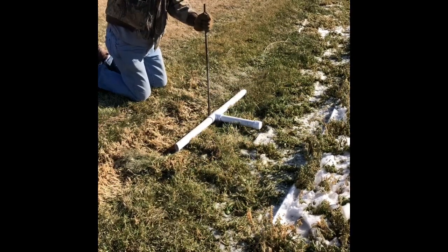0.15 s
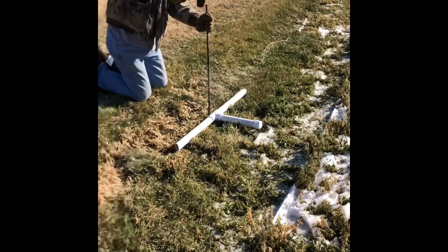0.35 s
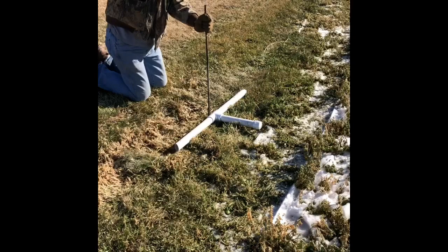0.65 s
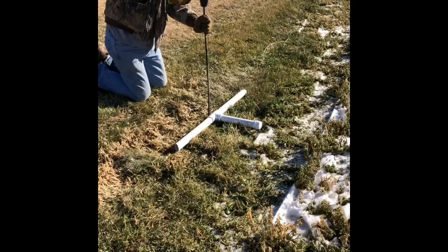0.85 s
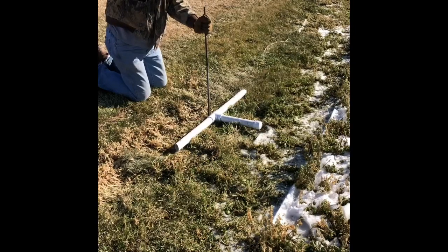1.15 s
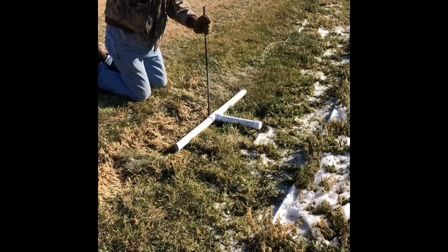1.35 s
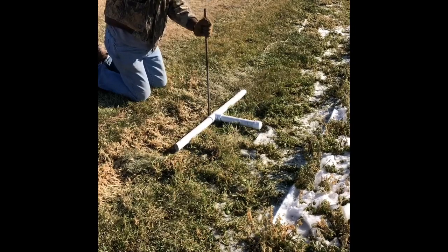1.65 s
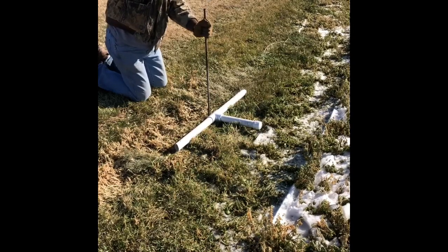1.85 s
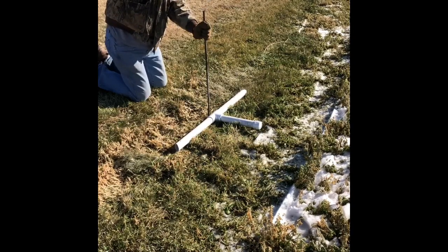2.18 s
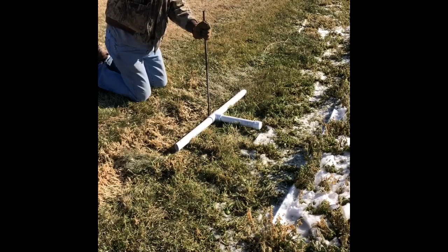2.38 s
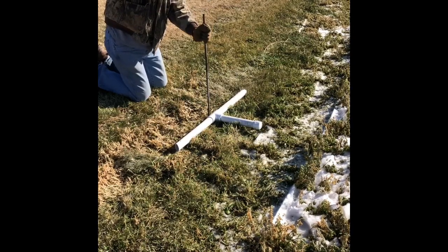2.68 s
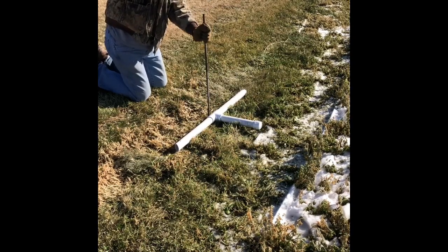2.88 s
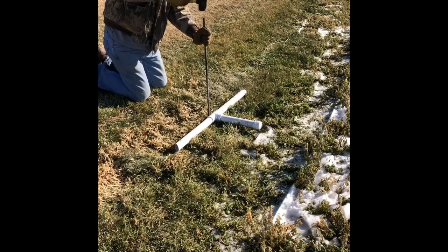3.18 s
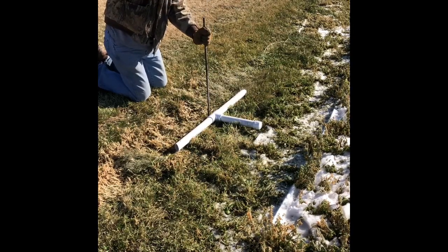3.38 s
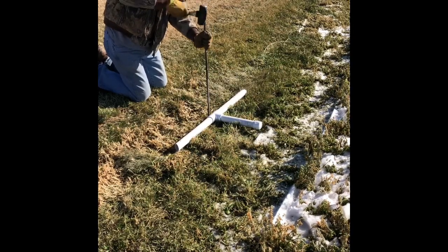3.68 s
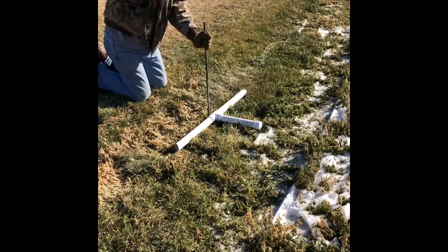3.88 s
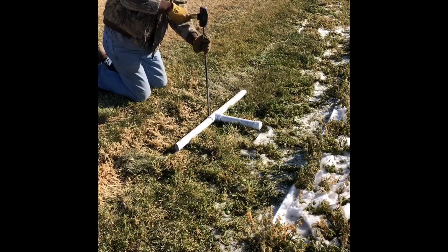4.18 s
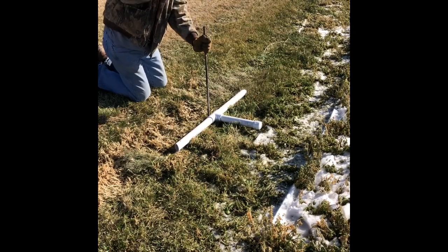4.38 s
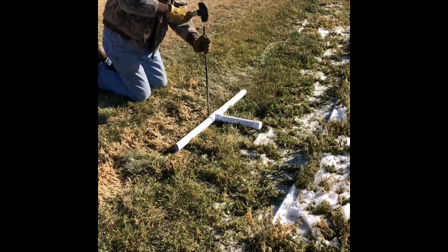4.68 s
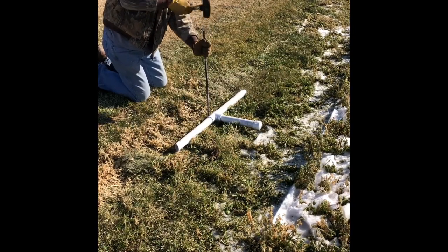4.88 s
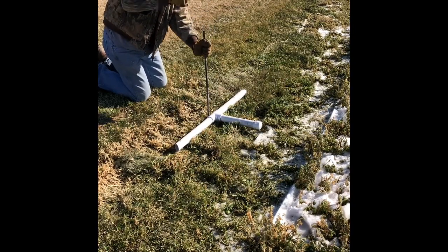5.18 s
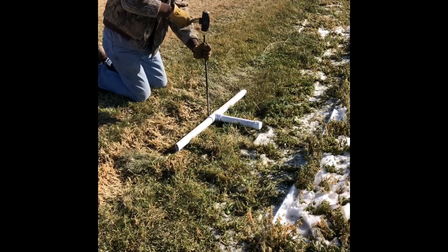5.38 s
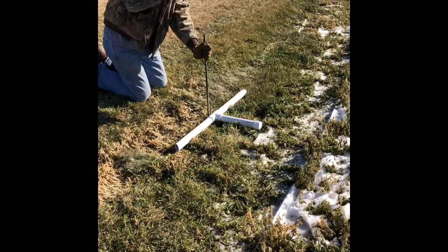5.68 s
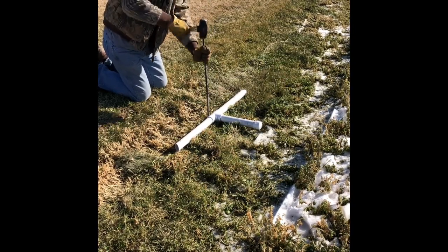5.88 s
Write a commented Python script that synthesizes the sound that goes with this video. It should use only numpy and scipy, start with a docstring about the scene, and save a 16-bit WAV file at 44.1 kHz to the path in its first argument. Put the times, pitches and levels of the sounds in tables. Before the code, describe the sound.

Steady hammer blows on a steel stake outdoors, each a short metallic clink with a soft thud from the soil.

```python
"""A quiet yard rumbles faintly and dry grass ticks. Then a small sledge drives a thin steel stake through a
plastic pipe stand into the frozen lawn, eleven steady blows. A gloved hand damps the stake, so each is a
short bright clink with a thud from the soil. Between blows a sleeve swishes. As the stake seats, the thud
shrinks and the steel rings and chatters more. Before the last blow, wind puffs against the microphone."""
import sys
import numpy as np
from scipy import signal
from scipy.fft import rfft, irfft
from scipy.io import wavfile
from scipy.ndimage import uniform_filter1d

SR = 44100
rng = np.random.default_rng(int(sys.argv[2]) if len(sys.argv) > 2 else 0)


def generate_wav(sig):
    """Save sig (samples, or channels by samples) to the path in sys.argv[1] as 16-bit PCM at SR."""
    pcm = np.round(np.clip(np.atleast_2d(sig).T, -1, 1) * 32767).astype(np.int16)
    wavfile.write(sys.argv[1], SR, pcm)


N = 266805
TIME = np.arange(N) / SR
HIT = np.arange(8192) / SR  # time axis of a one-shot [s]

# modes of the stake and hammer head (frequency [Hz])
STEEL_MODES = [1115, 2330, 2830, 3462, 4238, 4935, 5670, 6580, 7398, 8324, 9350, 10330, 11390, 12480, 13630,
               14785, 15615]


def amp(db):
    """Decibels to gain."""
    return 10 ** (np.asarray(db) / 20)


def read(points, hz):
    """Reads a curve on a log-frequency axis."""
    f, value = np.transpose(points)
    return np.interp(np.log(hz + 1), np.log(f), value)


def bins(x):
    """Frequencies of the spectrum of x."""
    return np.fft.rfftfreq(len(x), 1 / SR)


def bell(hz, centre_hz, octaves):
    """A bell curve on the log-frequency axis."""
    return np.exp(-.5 * (np.log2((hz + 1) / centre_hz) / octaves) ** 2)


def noise(t, colour_db):
    """Noise of rms 1, coloured bin by bin."""
    x = irfft(rfft(rng.standard_normal(len(t))) * amp(colour_db), len(t))
    return x / x.std()


def packed(x, seconds):
    """Scales x to the energy of a unit signal lasting that long."""
    return x * np.sqrt(seconds * SR / np.sum(x ** 2))


def add(mix, s, sound):
    """Lays a sound into the mix at time s."""
    part = mix[max(round(s * SR), 0):][:len(sound)]
    part += sound[:len(part)]


def seating(seated, loose, firm):
    """Morphs a setting from a loose stake (0) to a firm one (1)."""
    return loose + (firm - loose) * np.clip(seated, 0, 1)


def air(bed_db=-64, drone_hz=113, drone_db=-70):
    """The outdoor bed: distant rumble and hiss with a far, wavering drone."""
    # colour of the bed (frequency [Hz], level [dB])
    colour = [(20, -25.5), (45, -4.5), (75, 0.5), (112, -0.5), (150, -6), (250, -11.5), (450, -14.5),
              (800, -18), (1300, -26), (2200, -30), (5000, -33.5), (10000, -34.5), (15600, -39.5),
              (16200, -59.5)]
    f = bins(TIME)
    drone = noise(TIME, -20 * np.log10(1 + ((f - drone_hz) / 7) ** 2))
    return amp(bed_db) * noise(TIME, read(colour, f)) + amp(drone_db) * drone


def grass_ticks(t60=.0059):
    """Dry grass gives thin, bright ticks."""
    # tick cues (time [s], level [dB])
    ticks = [(.014, -63.5), (.489, -63.5), (.596, -65), (1.138, -63.5), (2.635, -66), (4.26, -64),
             (6.015, -61)]
    out = np.zeros(N)
    for s, db in ticks:
        tick = noise(HIT, 30 * bell(bins(HIT), 12000, octaves=1)) * amp(-60 * HIT / t60)
        add(out, s, amp(db) * packed(tick, .0014))
    return out


def hammering():
    """Each blow clinks, bends the stake and thumps the soil; a firm stake thumps less and chatters more."""
    # sledge blows (time [s], level [dB], seating [0 loose to 1 firm], midrange clank [dB],
    # bending wave [dB], its centre [Hz], first bounce after [s], fade per bounce [dB])
    blows = [(0.2953, -11.5, 0, 0.5, -24, 340, 0.0044, -7),
             (0.8398, -11.5, 0.016, -3.5, -32, 400, .0045, -14.5),
             (1.3890, -10, 0.22, 1.5, -26.5, 300, 0.0057, -5),
             (1.9343, -9.5, 0.54, 0, -27, 1100, 0.0045, -2),
             (2.4773, -11.5, 0.66, -2.5, -36, 300, 0.0081, -2.5),
             (3.0336, -12, 0.77, 0, -31, 850, 0.0084, -1.5), (3.589, -11.5, 0.83, 8, -37, 800, 0.0094, -2),
             (4.1392, -11, .85, 0.5, -36.5, 700, .0097, 0), (4.6883, -11.5, 0.98, 7, -36.5, 800, 0.0095, 0),
             (5.2521, -11.5, 0.91, 8.5, -33.5, 780, 0.0085, -1),
             (5.8265, -12, 0.82, 5, -28, 800, 0.0077, 0.5)]
    out = np.zeros(N)
    for s, db, seated, clank_db, bend_db, bend_hz, gap, fade_db in blows:
        t60 = seating(seated, .026, .021)
        ring_db = seating(seated, -3.5, 5)  # clear ring against the crack
        tilt_db = seating(seated, 19.5, -2)  # per octave
        strike = clink(clank_db, ring_db, tilt_db, crack_t60=t60, ring_t60=1.25 * t60, snap=.7)
        add(out, s, amp(db) * strike)
        add(out, s, amp(bend_db) * bending_wave(bend_hz))
        add(out, s, amp(-44) * yard_tail())

        bounces, last_s = chatter(gap, fade_db)
        add(out, s, amp(db + seating(seated, -16.5, -9.5)) * bounces)
        add(out, s + last_s, amp(seating(seated, -62, -51.5)) * yard_tail())
        add(out, s + last_s + .013, amp(-44.5) * stake_tap())  # a faint last tap just after the chatter

        firmness = seated ** .6  # the thud shrinks most in the first few blows
        thud = low_thud(low_cut_hz=seating(firmness, 50, 121))  # tighter as the stake seats
        thud_delay = seating(firmness, .0155, .0145)
        add(out, s + thud_delay, amp(seating(firmness, -29.5, -40.5)) * thud)
    return out


def clink(clank_db, ring_db, tilt_db, crack_t60, ring_t60, snap, spread_db=.5):
    """Steel meets steel: a crack of dense, fast-dying modes and the few that ring on."""
    # colour of the crack (frequency [Hz], level [dB])
    colour = [(60, -37.5), (200, -18), (500, -14), (1000, -8), (1700, -4), (2400, -4.5), (4500, 1.5),
              (6500, -0.5), (9000, -1.5), (12500, 1.5), (14500, -1), (16000, -8)]
    # strength of each steel mode (level [dB])
    mode_levels = [-21.5, -14.5, -18, -13.5, -12, -8, -19.5, -19, -0.5, -3.5, -1.5, 3, -5, -1.5, -12, -11.5,
                   -12]
    f, t = bins(HIT), HIT[:len(HIT) // 2]
    crack_db = read(colour, f) + clank_db * bell(f, 2300, octaves=.6)
    crack = noise(HIT, crack_db)[:len(t)] * amp(-60 * t / crack_t60)
    hz, db = np.array([STEEL_MODES, mode_levels])[:, :, None]
    db = db + spread_db * rng.standard_normal(hz.shape)  # the spot struck shifts the balance of modes
    db += tilt_db * np.log2(np.maximum(hz, 6000) / hz.max())
    t60 = ring_t60 * (hz.mean() / hz) ** .25  # high modes die sooner
    modes = amp(db - 60 * t / t60) * np.sin(2 * np.pi * (hz * t + rng.random(hz.shape)))
    # the force jumps at first touch and peaks as the stress wave comes back up the stake
    force = np.minimum(t / .0003, 1) * (1 + snap * np.exp(-((t - .0014) / .0005) ** 2))
    both = packed(crack * force, .004) + amp(ring_db) * packed(modes.sum(0) * force, .004)
    return both / np.hypot(1, amp(ring_db))


def bending_wave(centre_hz, travel_s=.0027, loss_db=-13, width_hz=380, low_cut_hz=220):
    """A bending wave runs up and down the stake; its lows travel slower and arrive later."""
    f = bins(HIT)
    delay = travel_s * rng.uniform(.88, 1.12)  # one length of the stake, at 1 kHz
    phase = 4 * np.pi * delay * np.sqrt(f * 1000)
    trips = sum(amp(loss_db * k) * np.exp(-1j * (2 * k + 1) * phase) for k in range(3))
    colour = f / (f + low_cut_hz) / (1 + ((f - centre_hz) / width_hz) ** 2)
    return packed(irfft(trips * colour), .004)


def yard_tail(attack_s=.0095, tint_db=5):
    """Shaken soil and grass and the scatter from the yard leave a faint tail, tinted by the steel."""
    # colour of the tail (frequency [Hz], level [dB])
    colour = [(25, -12.5), (60, 8.5), (130, 13.5), (300, 7.5), (800, 3), (1500, -4.5), (4000, -0.5),
              (8000, 1), (12000, 5), (16000, -6)]
    # decay of the tail (frequency [Hz], t60 [s])
    decay = [(100, .2), (800, .16), (3000, .13), (8000, .108), (15000, .1)]
    f = bins(HIT)
    tint = np.sum(1 / (1 + ((f - np.array(STEEL_MODES)[:, None]) / 70) ** 2), axis=0)
    rush = noise(HIT, read(colour, f) + tint_db * tint)
    hz, t, bands = signal.stft(rush, SR, nperseg=256)
    bands *= amp(-60 * t / read(decay, hz)[:, None])
    tail = signal.istft(bands, SR, nperseg=256)[1][:len(HIT)]
    return packed(tail * np.minimum(HIT / attack_s, 1), .036)


def chatter(gap, fade_db, gap_ratio=.61, last_db=-4, count=4):
    """The stake bounces ever quicker against the hammer; returns the sound and the last bounce's time."""
    out = np.zeros(len(HIT))
    times = np.cumsum(gap * gap_ratio ** np.arange(count))
    for k, s in enumerate(times):
        add(out, s, amp(fade_db * k + last_db * (k == count - 1)) * stake_tap())
    return out, times[-1]


def stake_tap(bend_db=-21):
    """A light steel tap: a short clink and a weak bending wave."""
    out = amp(bend_db) * bending_wave(centre_hz=785)
    add(out, 0, clink(clank_db=2, ring_db=2.5, tilt_db=-2, crack_t60=.016, ring_t60=.022, snap=0))
    return out


def low_thud(low_cut_hz, attack_s=.0011):
    """A low thud with a brief boom, tuned a little differently each time, its deepest lows trimmed."""
    # resonances of the thud (frequency [Hz], level [dB], t60 [s])
    resonances = [(61, -11, 0.45), (113.7, 5, 0.1), (165, 2, 0.045), (198, -3.5, 0.033), (460, -14.5, .04)]
    hz, db, t60 = np.transpose(resonances)[:, :, None]
    detune = rng.uniform(.93, 1.05, hz.shape)
    modes = amp(db - 60 * HIT / t60) * np.sin(2 * np.pi * hz * detune * HIT)
    low_cut = signal.butter(2, low_cut_hz, "high", fs=SR, output="sos")
    trimmed = signal.sosfilt(low_cut, modes * np.minimum(HIT / attack_s, 1))
    return packed(trimmed.sum(0), .0077)


def stand_knocks(attack_s=.002, t60=.017):
    """The pipe stand and the ground give dull, dry knocks."""
    # knock cues (time [s], level [dB], centre [Hz])
    knocks = [(0.316, -45.5, 582), (0.8598, -41, 670), (0.881, -44, 550), (4.504, -58, 364),
              (4.524, -59.5, 349)]
    out = np.zeros(N)
    envelope = np.minimum(HIT / attack_s, 1) * amp(-60 * HIT / t60)
    for s, db, hz in knocks:
        body = noise(HIT, 70 * bell(bins(HIT), hz, octaves=2.3))
        add(out, s, amp(db) * packed(body * envelope, .005))
    return out


def sleeve(grain_db=2):
    """Cloth slides on cloth: a grainy hiss that swells and fades with each move of the arm."""
    # jacket swishes (time [s], level [dB], width [s])
    swishes = [(1.62, -71, 0.047), (1.681, -60, .016), (4.535, -75.5, 0.022), (4.62, -75.5, 0.063),
               (4.83, -78, 0.087), (5.15, -80, .07), (5.49, -75, 0.088), (6.03, -76.5, .06)]
    # colour of the cloth (frequency [Hz], level [dB])
    colour = [(200, -21.5), (500, -5.5), (950, -9), (1400, -6.5), (2500, -6), (4400, -10.5), (6000, -9.5),
              (10000, -17), (16000, -16)]
    grain = uniform_filter1d(rng.standard_normal(N), size=150)
    swells = sum(amp(db) * np.exp(-.5 * ((TIME - s) / width) ** 2) for s, db, width in swishes)
    return swells * amp(grain_db * grain / grain.std()) * noise(TIME, read(colour, bins(TIME)))


def wind_puffs(width_s=.01):
    """Wind buffets the microphone in soft, low puffs."""
    # puff peaks (time [s], level [dB])
    puffs = [(5.413, -42.5), (5.448, -49.5), (5.48, -47), (5.534, -50.5), (5.581, -46)]
    out = np.zeros(N)
    swell = np.exp(-.5 * ((HIT - HIT.mean()) / width_s) ** 2)
    for s, db in puffs:
        rumble = noise(HIT, 65 * bell(bins(HIT), 78, octaves=1.96))
        add(out, s - HIT.mean(), amp(db) * packed(rumble * swell, .012))
    return out


def scene(echo_s=.096, echo_db=-60):
    """The blows and their faint slap off a far wall, over the quiet yard."""
    blows = hammering()
    out = air() + grass_ticks() + blows + stand_knocks() + sleeve() + wind_puffs()
    add(out, echo_s, amp(echo_db) * blows)
    return out[None]


def record(dry, ceiling=1.1, high_cut_hz=16500):
    """Soft saturation rounds off the highest peaks; a steep high cut trims the top."""
    soft = ceiling * np.tanh(dry / ceiling)
    low_pass = signal.firwin(255, high_cut_hz, window=("kaiser", 9), fs=SR)
    return signal.oaconvolve(soft, low_pass[None], "same")


dry = scene()
out = record(dry)
generate_wav(out)
```